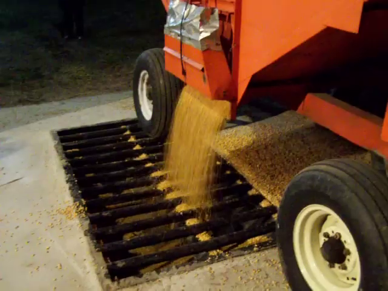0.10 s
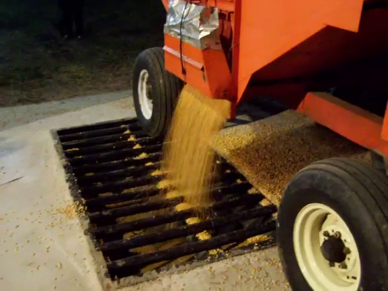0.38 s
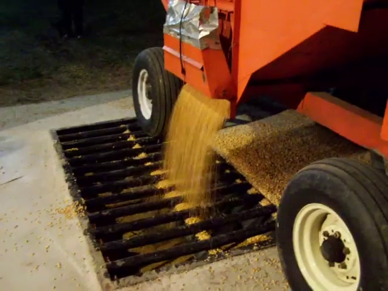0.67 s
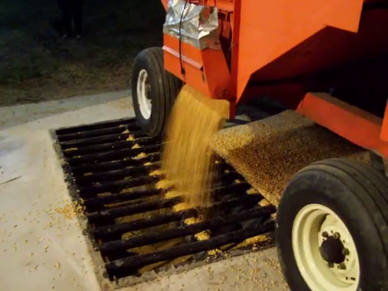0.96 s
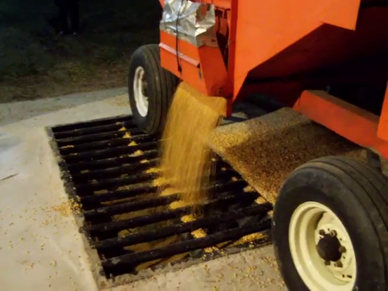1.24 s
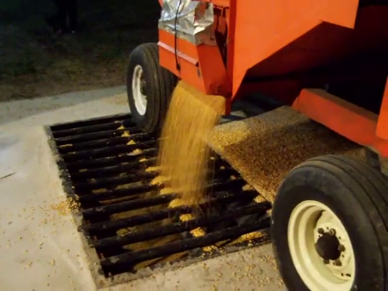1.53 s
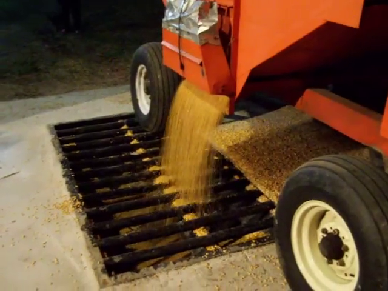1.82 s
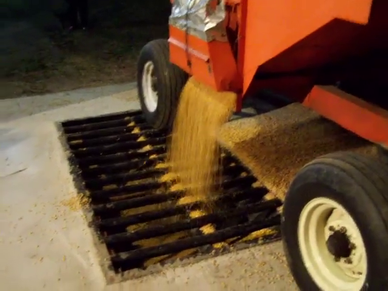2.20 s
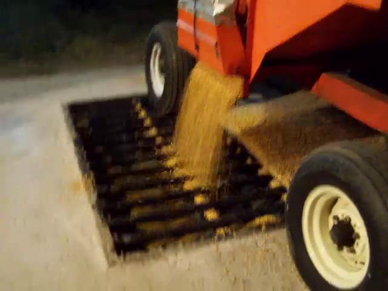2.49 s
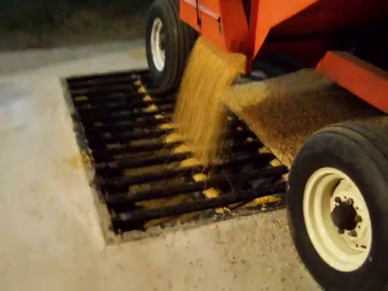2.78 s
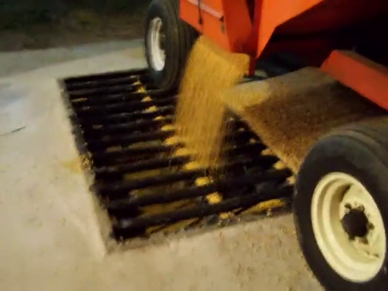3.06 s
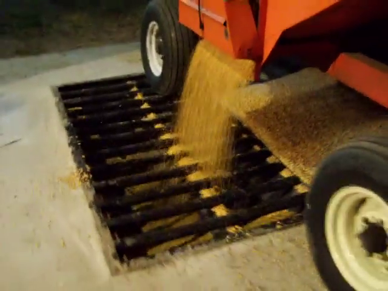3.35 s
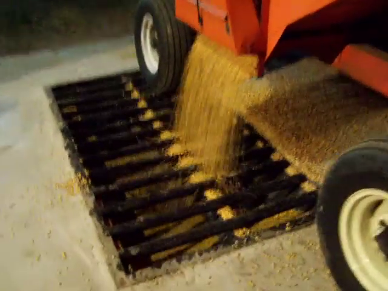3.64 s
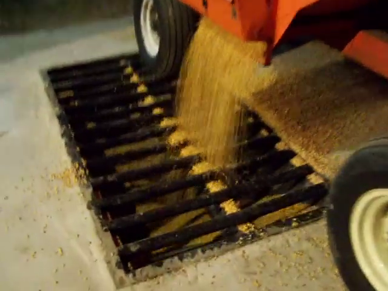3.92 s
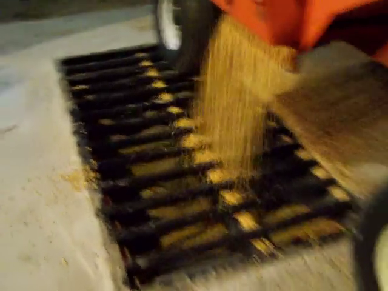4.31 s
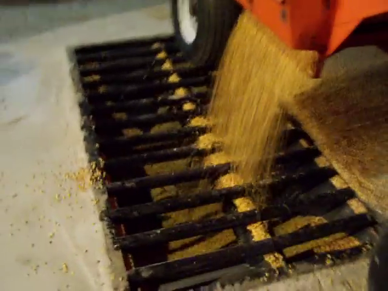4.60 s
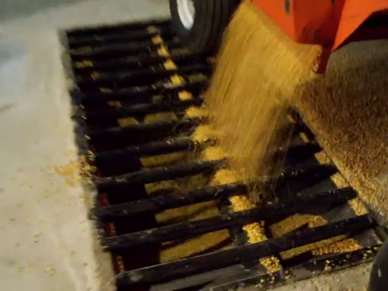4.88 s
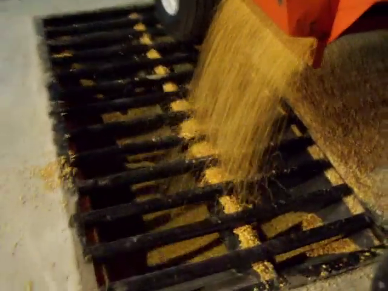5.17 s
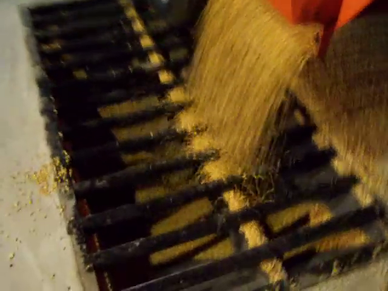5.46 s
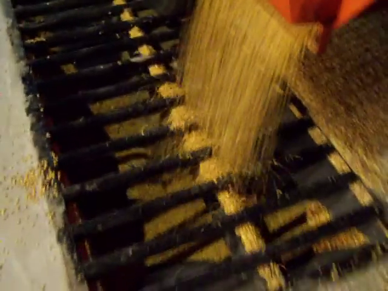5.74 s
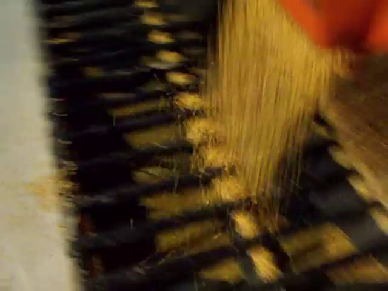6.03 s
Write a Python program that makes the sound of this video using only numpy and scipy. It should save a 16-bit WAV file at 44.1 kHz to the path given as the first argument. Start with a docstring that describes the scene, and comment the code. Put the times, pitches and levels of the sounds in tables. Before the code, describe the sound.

Corn pours steadily through a steel grate into a pit, a dense hissing rattle of kernels over a low machinery rumble.

```python
"""Shelled corn streams from a wagon chute through a steel grate into a pit, outdoors at night.
The sound opens abruptly: thousands of kernels tick on the bars and on each other over the hiss of
sliding grain. The bars ring faintly, the pit and the wagon box drum, and machinery rumbles below.
The microphone draws back a step, then approaches from about 3 s on: the patter in the pit swells
twice, and the drumming grows toward the end."""
import sys
import numpy as np
from scipy import signal
from scipy.fft import rfft, irfft
from scipy.io import wavfile

SR = 44100
rng = np.random.default_rng(int(sys.argv[2]) if len(sys.argv) > 2 else 0)


def wrap_up_sound(samples):
    """Save the sound to the file named by the first command line argument, as 16-bit audio."""
    columns = np.atleast_2d(samples).T
    # keep every value between -1 and 1, then stretch to whole-number steps
    tamed = np.clip(columns, -1, 1)
    steps = np.round(tamed * 32767).astype(np.int16)
    wavfile.write(sys.argv[1], SR, steps)


N = 279153
TIME = np.arange(N) / SR

# Spectrum of a kernel's tick: (frequency [Hz], relative spectral density [dB])
TICK_SPECTRUM = [(150, -25), (700, -23.5), (1300, -17.5), (1950, -14.5), (2500, -10), (3000, -6),
                 (3480, -2), (4020, -0.5), (4450, -5.5), (5100, -9), (6500, -15.5), (7350, -20.5),
                 (8000, -30), (9000, -42.5)]
# Modes of the steel bars: (frequency [Hz], bandwidth [Hz], relative level [dB])
BAR_MODES = [(1012, 6, -16), (2627, 7, -8), (3041, 5, 0), (3186, 8, -3), (3294, 8, -1.5), (3558, 6, .5),
             (3612, 8, -1)]
# Spectrum of grain landing on grain: (frequency [Hz], relative spectral density [dB])
PATTER_SPECTRUM = [(200, -14), (400, -3), (470, -1.5), (540, 1), (720, 0.5), (850, -5), (980, -1.5),
                   (1200, -6), (1380, -8.5), (1490, 0.5), (1950, -4), (2170, 6), (2450, 3.5), (4000, -36.5)]
# Swells of the patter: (time of peak [s], rise [dB])
PATTER_SWELLS = [(3.45, 3.0), (4.52, 4)]
# Modes of the pit and the wagon box:
# (frequency [Hz], bandwidth [Hz], relative level from afar [dB], rise at nearness 1 [dB])
BOX_MODES = [(129, 22, -6, 7.5), (222, 12, -5.5, 5), (238.6, 9.8, -1, 4.5), (258.3, 6.5, -7, 4),
             (289.5, 22, -5, 4), (321.7, 15, -7, 2), (349.9, 3.6, -13, 17), (360, 21, -22, 0)]
# Spectrum of the machinery rumble: (frequency [Hz], relative spectral density [dB])
RUMBLE_SPECTRUM = [(20, -22.5), (34, -12.5), (46, -3), (56, -1.5), (62, -10), (71, 1), (88, 0.5), (104, -5),
                   (125, 1.5), (148, 2), (165, 2), (186, -5.5), (260, -3), (600, -44.5)]
# Tones of the machinery hum: (frequency [Hz], level relative to the rumble [dB])
HUM_TONES = [(56, -13), (112.5, -15), (174, -6)]
# Path of the microphone relative to the grate: (time [s], nearness [0-1])
MIC_NEARNESS = [(0.34, 0.2), (2.6, 0.01), (3.15, 0), (6.33, 0.83)]


def kernel_strikes(flow, per_s=1500, rebound_db=3, rebound_s=0.0076):
    """Impact and rebound: each blow on the grate is followed by a decaying skitter among kernels."""
    blows = unit_rms(impacts(per_s * flow))
    skitter = np.sqrt(smooth(blows ** 2, rebound_s)) * rng.standard_normal(N)
    return unit_rms(blows + gain_of(rebound_db) * skitter)


def grate(strikes, flow, level_db=-19.0, slide_db=-12, bars_db=-19.5):
    """Impacts tick and excite the bars' natural modes, while sliding friction adds a hiss."""
    sliding = gain_of(slide_db) * flow * rng.standard_normal(N)
    rattle = colour(strikes + sliding, TICK_SPECTRUM)
    bars = unit_rms(sum(gain_of(db) * ring(strikes, hz, width) for hz, width, db in BAR_MODES))
    return gain_of(level_db) * unit_rms(rattle + gain_of(bars_db) * bars)


def pit(strikes, flow, patter_db=-33.5, closer_db=1.5, drum_db=-41, strike_share=0.62, swell_s=0.3):
    """Forced vibration: grain lands dully on the heap and drives the modes of the hollow steel."""
    landings = unit_rms(impacts(per_s=1300 * flow))
    patter = colour(landings + strike_share * strikes, PATTER_SPECTRUM)
    near = curve(MIC_NEARNESS)
    swell_db = sum(rise_db * np.exp(-((TIME - peak_s) / swell_s) ** 2)
                   for peak_s, rise_db in PATTER_SWELLS)
    drum = sum(gain_of(db + near_db * near) * ring(landings, hz, width)
               for hz, width, db, near_db in BOX_MODES)
    return gain_of(patter_db + closer_db * near + swell_db) * patter + gain_of(drum_db) * drum


def machinery(level_db=-41.0, closer_db=1.5, pitch_waver=0.0079):
    """Superposition of a low continuous spectrum and wavering tones, a little louder from close by."""
    wavering_time = np.cumsum(1 + pitch_waver * wander(4.1)) / SR
    hum = np.zeros(N)
    for hz, db in HUM_TONES:
        amplitude = np.sqrt(2) * gain_of(db + 2.0 * wander(4.8))
        hum += amplitude * np.sin(2 * np.pi * hz * wavering_time)
    rumble = colour(rng.standard_normal(N), RUMBLE_SPECTRUM, size=16384)
    return gain_of(level_db + closer_db * curve(MIC_NEARNESS)) * unit_rms(rumble + hum)


def impacts(per_s):
    """Poisson arrivals of equal strength, since all kernels fall from the same height."""
    return rng.choice([-1, 1], N) * (rng.random(N) < per_s / SR)


def ring(x, hz, width_hz):
    """Resonance: the response of one damped mode driven by x, at rms 1."""
    pole = np.exp((2j * np.pi * hz - np.pi * width_hz) / SR)
    return unit_rms(signal.lfilter([1], [1, -pole], x).real)


def colour(x, spectrum, size=4096):
    """Minimum-phase filtering imposes a spectrum, at rms 1, while clicks keep their sharp front."""
    hz, db = np.transpose(spectrum)
    bin_hz = abs(np.fft.fftfreq(size, 1 / SR))
    log_gain = np.log(gain_of(np.interp(np.log(bin_hz + 1), np.log(hz), db)))
    response = np.exp(np.conj(signal.hilbert(log_gain)))
    taps = np.fft.ifft(response).real[:size // 2]
    return unit_rms(signal.oaconvolve(x, taps)[:N])


def wander(hz):
    """Low-pass noise: a random fluctuation of rms 1, mostly slower than hz."""
    bin_hz = np.fft.rfftfreq(N, 1 / SR)
    return unit_rms(irfft(rfft(rng.standard_normal(N)) / (1 + (bin_hz / hz) ** 2), N))


def smooth(x, seconds):
    """Leaky integration: a running average with an exponential tail."""
    keep = np.exp(-1 / (seconds * SR))
    return signal.lfilter([1 - keep], [1, -keep], x)


def curve(rows):
    """Linear interpolation of (time, value) points at every sample."""
    return np.interp(TIME, *np.transpose(rows))


def gain_of(db):
    """Amplitude ratio of a level in decibels."""
    return 10 ** (np.asarray(db) / 20)


def unit_rms(x):
    """Normalisation to rms 1."""
    return x / np.sqrt(np.mean(x ** 2) + 1e-20)


def gain_control(x, knee_db=-19, squeeze=0.37, follow_s=0.0023):
    """Compression: the gain falls as short-term power exceeds the knee, softening the louder clumps."""
    power_db = 10 * np.log10(smooth(x ** 2, follow_s) + 1e-12)
    return x * gain_of(-squeeze * np.maximum(power_db - knee_db, 0))


def scene(clump_db=0.4):
    """Common excitation: one slightly uneven flow drives grate and pit, above the machinery."""
    flow = gain_of(clump_db * wander(35))
    strikes = kernel_strikes(flow)
    return (grate(strikes, flow) + pit(strikes, flow) + machinery())[None]


def record(dry, start_s=0.336, settle_db=-6.0, settle_s=0.039, bass_hz=38, treble_hz=8750):
    """Band limiting and compression; the microphone opens abruptly and settles to full level."""
    high_pass = signal.butter(N=4, Wn=bass_hz, btype="high", fs=SR, output="sos")
    compressed = gain_control(signal.sosfilt(high_pass, dry))
    open_s = np.maximum(TIME - start_s, 0)
    opening = (open_s > 0) * gain_of(settle_db * np.exp(-open_s / settle_s))
    low_pass = signal.firwin(191, treble_hz, window=("kaiser", 9), fs=SR)
    return signal.oaconvolve(compressed * opening, low_pass[None], "same")


dry = scene()
out = record(dry)
wrap_up_sound(out)
```